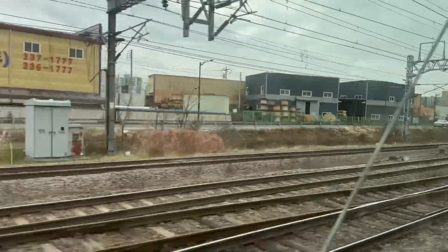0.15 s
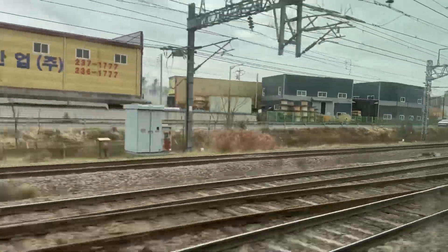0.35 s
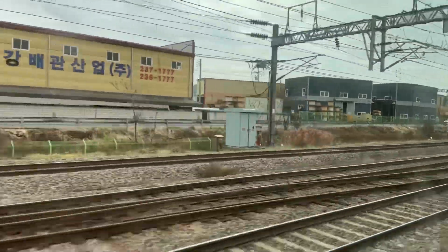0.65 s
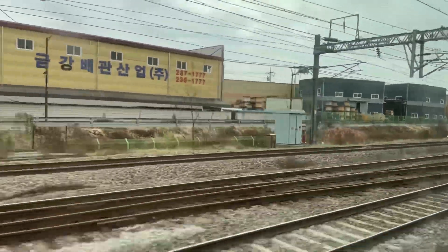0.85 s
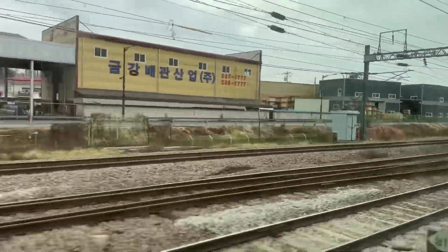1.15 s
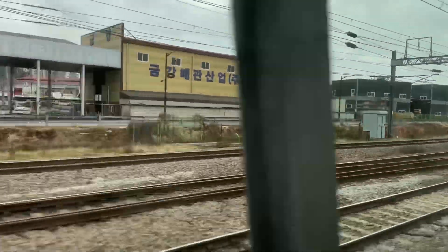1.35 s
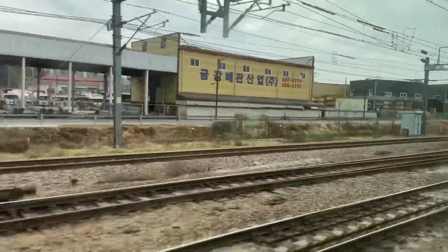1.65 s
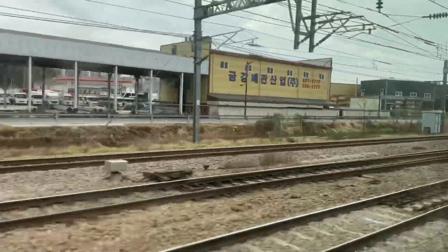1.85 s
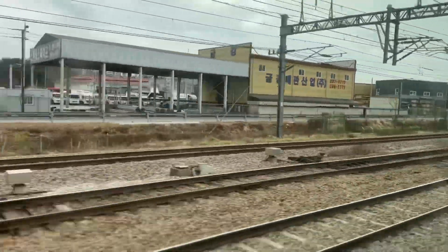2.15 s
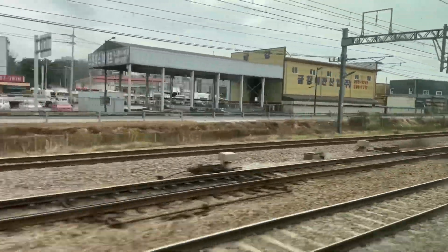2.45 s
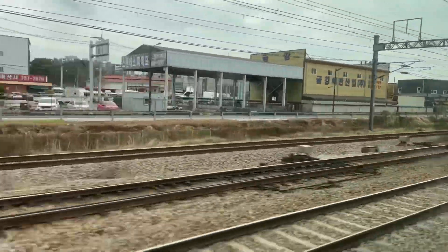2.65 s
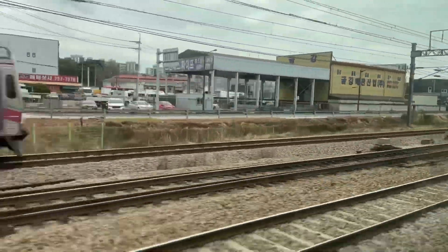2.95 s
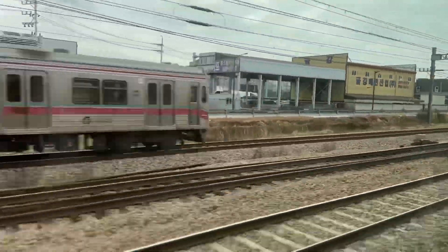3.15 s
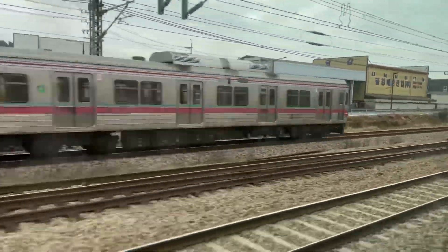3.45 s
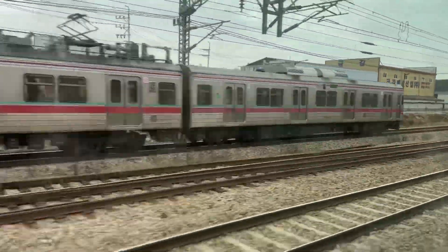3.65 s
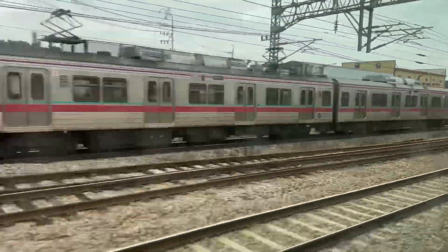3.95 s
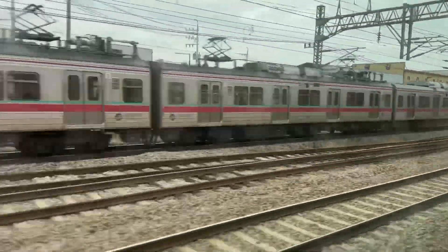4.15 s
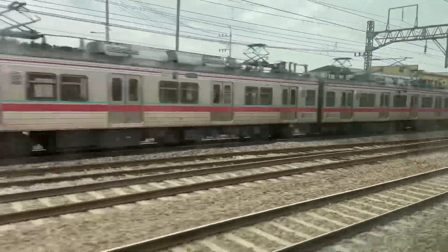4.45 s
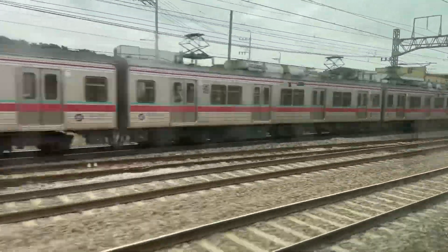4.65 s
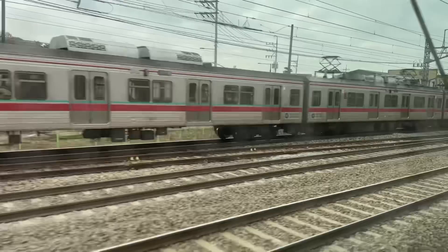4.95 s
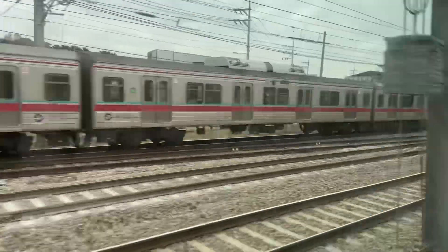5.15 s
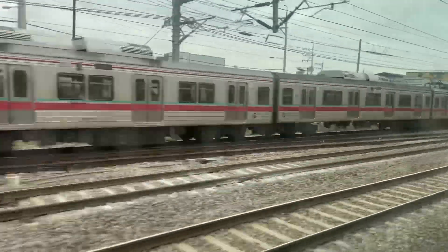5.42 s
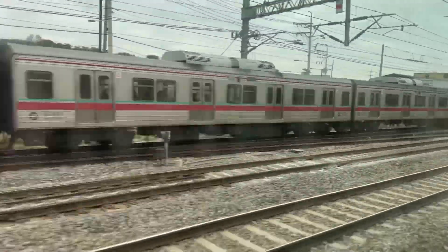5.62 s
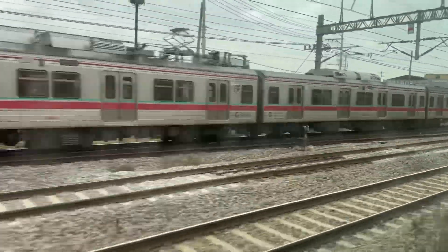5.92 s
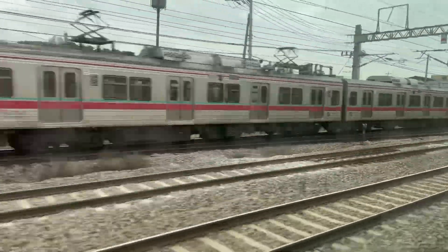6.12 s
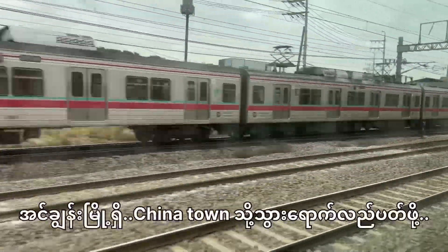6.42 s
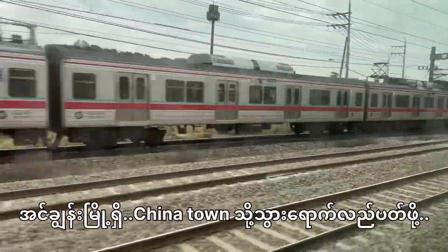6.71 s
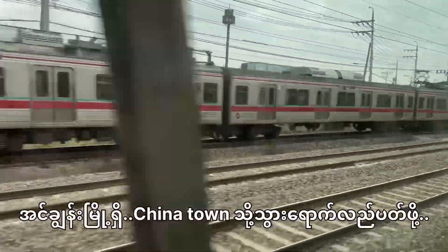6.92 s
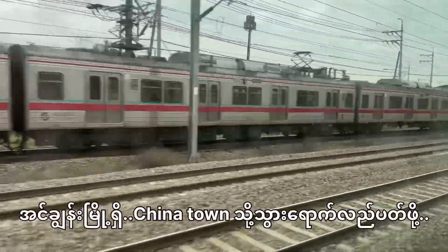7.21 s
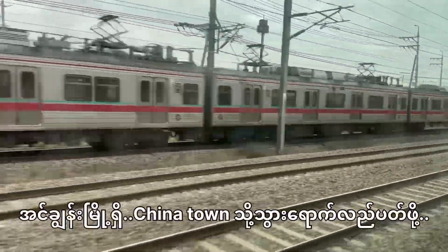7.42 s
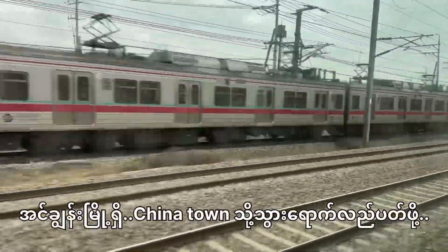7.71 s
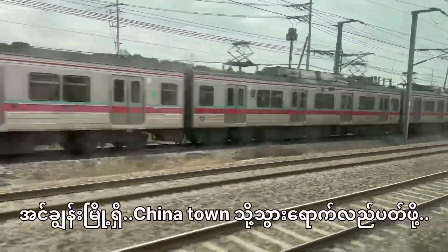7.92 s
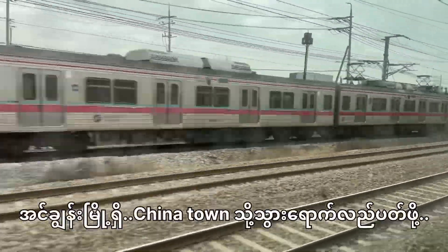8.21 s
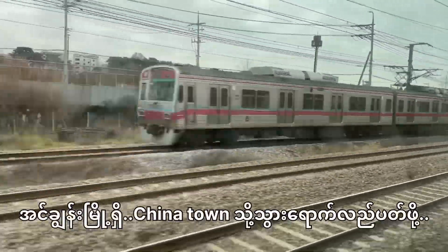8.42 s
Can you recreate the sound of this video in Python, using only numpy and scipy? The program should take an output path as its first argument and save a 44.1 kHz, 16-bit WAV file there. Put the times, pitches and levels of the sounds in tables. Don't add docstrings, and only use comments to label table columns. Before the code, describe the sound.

Inside a passenger train carriage at speed, captured by a handheld phone in narrow stereo. A continuous deep rumble, strongest below about 200 Hz, wavers and booms through the floor, with soft dull hiss above and a faint mid-low machine hum and gear whine. Strong paired wheel thuds land near 0.35, 0.75 and 1.35 seconds, with knocks and short shudders. At 2.3 another pair strikes and the wheel frame rings low briefly. From 2.7 a train alongside subtly changes and fills the roar. Thuds follow at 3.3 and 4.3, where a small air puff hisses, then 4.7, 5.3 and a hard knock at 6.0. A tiny high squeak chirps at 6.1. Uneven drumming and light trim rattles continue, with a metallic tick around 7.4. From 8.0 to 8.35 rapid blows cluster over points, then rumbling continues until 8.6.

```python
import sys
import numpy as np
from scipy import signal
from scipy.fft import rfft, irfft, next_fast_len
from scipy.io import wavfile
from scipy.ndimage import uniform_filter1d

SR = 44100
rng = np.random.default_rng(int(sys.argv[2]) if len(sys.argv) > 2 else 0)


def wav_out(sig):
    wavfile.write(sys.argv[1], SR, np.round(np.clip(np.atleast_2d(sig).T, -1, 1) * 32767).astype(np.int16))


def natural_amplitude(level_db):
    exponent = np.asarray(level_db, float) / 20
    return 10 ** exponent


N = 377937
M = next_fast_len(N, real=True)
T, HZ = np.arange(M) / SR, np.fft.rfftfreq(M, 1 / SR)

# [t/s, level/dB]
ROUGHNESS = [(0.0, -30), (0.55, -26), (0.981, -24), (1.14, -28), (2.58, -27.5), (2.889, -29.5),
             (3.428, -26), (4.32, -28), (4.51, -27), (5.11, -27), (5.37, -23), (6.85, -25.5), (7.23, -24),
             (7.85, -27), (8.21, -23), (8.57, -25.5)]
# [share of roughness felt, gain beside other train/dB, sway/dB, sway rate/Hz]
BODY_PARTS = [
    (0.15, 0.1, 0.4, 20),
    (1, 1.7, 2, 14),
    (0.19, -0.6, 0.7, 14),
    (0.11, 1.9, 0.5, 9),
]
PART_HZ = (70, 170, 550, 3000)
# [f/Hz, level per Hz/dB]
RUMBLE = [(20, -89), (30, -68), (40, -47), (60, -43.5), (130, -46.5), (200, -49), (280, -54.5),
          (340, -55.5), (400, -59), (460, -61), (750, -66), (1100, -70.5), (1300, -75)]
# [f/Hz, level per Hz/dB]
ROLLING_HISS = [(1300, -75), (1900, -77), (2300, -80.5), (2900, -83), (3250, -88.5), (4500, -90.5),
                (5200, -93), (7000, -93), (8500, -101), (9700, -103), (10250, -140), (12300, -145),
                (12600, -125), (14800, -131), (15100, -145)]
# [f/Hz, width/Hz, level/dB]
CABIN_MODES = [(68.7, 16, -29.5), (95.5, 29, -37), (142.2, 17, -34.5), (178, 12, -37), (205.2, 15, -39.5),
               (246, 30, -45), (372, 30, -46.5), (2137, 270, -57.5), (2800, 150, -61), (3525, 80, -68.5)]
# [t/s, f/Hz, level/dB]
BODY_BOOM = [(0.0, 67.7, -35), (0.07, 63.4, -24.5), (2.69, 74.5, -22.5), (3.34, 91.3, -21),
             (3.51, 73.4, -28), (3.7, 90.3, -15.5), (4.15, 59.97, -42), (4.56, 61.9, -22),
             (4.65, 73.8, -21.5), (5.46, 59.2, -22), (6.04, 96.7, -19.5), (6.18, 66.4, -34.5),
             (6.49, 68.4, -20.5), (6.59, 55.2, -23), (7.16, 89.5, -23.5), (7.45, 62.24, -20.5),
             (8.04, 57.3, -24.5), (8.57, 73.8, -20.5)]
# [t/s, f/Hz, level/dB]
FRAME_RING = [
    (2.305, 181, -45),
    (2.325, 179, -17.5),
    (2.4, 186.8, -26.5),
    (2.45, 178, -21),
    (2.49, 186, -49),
]
# [t/s, peak level/dB, low thud level/dB, thud f/Hz, shudder length/s]
JOINT_BLOWS = [(0.33, -9, -24, 149.3, 0.22), (0.4, -10, 0, 132, 0.21), (0.725, -17, -14, 142, 0.25),
               (0.769, -19.5, 2.5, 243, .23), (1.322, -15, -3, 173, .26), (1.404, -11, -15.5, 131, 0.21),
               (2.318, -13.5, -13, 178, 0.26), (2.393, -11.5, -11.5, 178, 0.29),
               (3.319, -16.5, 3.5, 181, 0.15), (3.408, -19.5, -19, 145, 0.28), (4.28, -15, -14, 143, 0.31),
               (4.347, -14, -6, 196, 0.22), (4.528, -17.5, 7, 137, 0.14), (4.731, -19.5, 7, 178.4, 0.25),
               (5.252, -12.5, -5.5, 169.7, 0.2), (5.328, -11, -8, 129, 0.21),
               (5.781, -15.5, 2.5, 149.5, 0.14), (5.997, -9, -7, 234.5, .1),
               (6.994, -19.5, -4.5, 132, 0.23), (7.538, -28, -3, 144.9, 0.28), (8.003, -20, -8, 239, 0.22),
               (8.059, -13.5, -4, 225, 0.15), (8.099, -16.5, -3, 133.5, 0.18), (8.134, -31, 2, 179, .2),
               (8.172, -14, -8, 151, 0.2), (8.261, -9, -10.5, 221, .13)]
# [t/s, thud level/dB, f/Hz]
RAIL_DIPS = [(1.715, -24.5, 129), (1.888, -13.5, 147.7), (2.585, -16.5, 177.4), (3.051, -21, 138.4),
             (3.85, -10, 151.3), (5.152, -30, 149), (5.409, -16, 134), (5.486, -3.5, 131.5),
             (6.197, -12.5, 188.6), (6.626, -14.5, 160.6), (7.118, -7.5, 163.7), (7.489, -16.5, 172),
             (8.508, -13, 141.4), (1.591, -18.5, 179.3), (1.839, -19.5, 138.7), (2.819, -17, 158.6),
             (4.595, -15, 144.5), (6.319, -17, 178), (7.366, -29, 192)]
# [f/Hz, level per Hz/dB]
SHUDDER_COLOUR = [(60, -22), (150, 8.5), (330, 5), (700, -8.5), (1200, -17.5), (2200, -21.5), (3200, -32),
                  (8000, -40), (10400, -68.5)]
# [f/Hz, level/dB, time to fall 60 dB t/s]
FLOOR_PLATE = [(263, -12.5, 0.011), (324.3, 1, 0.12), (390, -10, 0.053), (594, -10.5, 0.064),
               (664, -3.5, 0.052), (930, -30.5, 0.044), (1500, -22.5, .03), (2800, -28, .02)]
# [t/s, peak level/dB, f/Hz]
BODY_HEAVES = [(0.151, -15, 60.2), (0.476, -18.5, 123.7), (0.799, -14.5, 79.6), (0.897, -13, 64.6),
               (1.182, -13, 81.4), (1.29, -17.5, 61.6), (1.396, -13.5, 114.5), (1.506, -10.5, 86.5),
               (1.594, -11, 75.7), (1.704, -17, 94.2), (1.951, -16, 72.4), (2.01, -10, 87),
               (2.111, -14, 125), (2.319, -16.5, 78.6), (2.416, -19, 83), (2.54, -14, 80.7),
               (2.819, -10, 66.7), (2.941, -9.5, 84.5), (3.03, -13, 84), (3.127, -17, 90.5),
               (3.244, -15, 95.5), (3.666, -16.5, 88.3), (3.815, -11, 75.4), (3.896, -14, 78.5),
               (3.962, -11.5, 70.0), (4.23, -18, 85), (4.369, -23, 72.7), (4.484, -15.5, 67.6),
               (4.735, -17.5, 72.7), (4.858, -9, 79), (4.934, -13.5, 60.4), (5.218, -10, 73),
               (5.317, -12.5, 94.2), (5.408, -17, 69.5), (5.631, -12, 59.2), (5.771, -9, 64.6),
               (5.876, -15.5, 78.1), (6.018, -14, 101), (6.139, -19.5, 120.4), (6.3, -23, 51.1),
               (6.3, -10.5, 66.4), (6.37, -15, 64.6), (6.532, -18, 64.3), (6.596, -20, 65.4),
               (6.759, -13.5, 120.5), (6.913, -16, 88.5), (6.998, -14, 83), (7.129, -10.5, 73.4),
               (7.325, -10, 81.6), (7.722, -10, 72), (7.819, -17, 67.7), (7.882, -16.5, 72.7),
               (8.001, -16, 73), (8.094, -11, 83.4), (8.16, -13, 69.4), (8.274, -21, 98.7)]
# [t/s, peak level/dB, f/Hz]
FLOOR_DRUMS = [(0.346, -12, 144), (0.689, -15, 127.5), (0.797, -17.5, 164.2), (1.182, -14.5, 142),
               (1.338, -17, 173), (1.551, -19, 133), (1.723, -20, 143), (1.783, -17.5, 143),
               (1.84, -20, 135), (2.312, -11.5, 184), (2.399, -12, 190.6), (2.487, -14, 135.5),
               (2.567, -13, 178), (2.818, -18, 159), (3.066, -18, 130), (3.139, -20, 138),
               (3.303, -16, 124), (3.618, -20, 196), (3.764, -19, 134), (3.849, -15.5, 145),
               (4.297, -15, 151), (4.4, -15, 154.9), (4.516, -17, 136.5), (4.596, -15, 143),
               (4.73, -17, 188), (4.812, -11, 155), (4.961, -13, 125), (5.022, -10.5, 178),
               (5.241, -15.5, 171), (5.346, -14, 126), (5.476, -12, 140), (5.579, -18, 136),
               (5.793, -13.5, 137), (6.103, -10.5, 131.4), (6.222, -9.5, 157), (6.319, -17.5, 127.4),
               (6.373, -17, 152.2), (6.433, -19.5, 129), (6.545, -6, 145), (6.645, -20.5, 167),
               (6.74, -18.5, 158), (6.849, -15, 146), (6.977, -18.5, 129), (7.04, -11, 161),
               (7.144, -9, 190), (7.295, -17, 136), (7.429, -8, 170), (7.488, -13, 175.5),
               (7.824, -20, 152), (7.886, -14, 172), (8.054, -17.5, 210), (8.116, -16, 168),
               (8.172, -11, 193), (8.228, -14, 165.5), (8.305, -10.5, 154), (8.401, -18, 187)]
# [t/s, peak level/dB, f/Hz]
SHARP_CRACKS = [(0.238, -23, 524), (0.328, -27, 450), (0.3315, -22, 706), (0.349, -23, 498),
                (0.352, -25, 850), (0.365, -27.5, 804), (0.406, -18.5, 570), (0.413, -24, 910),
                (0.424, -25, 890), (0.435, -25, 760), (0.62, -24, 577), (0.679, -30, 694),
                (0.728, -18.5, 526), (0.805, -24.5, 610), (1.326, -27, 800), (1.345, -26, 465),
                (1.410, -19.5, 700), (1.428, -25, 750), (1.711, -26.5, 710), (1.773, -36, 563),
                (2.317, -17.5, 543), (2.403, -35, 450), (2.549, -27, 611), (4.268, -24.5, 525),
                (4.285, -22.5, 886), (4.319, -24, 475), (4.348, -22, 437), (4.364, -19, 607),
                (4.744, -24.5, 455), (5.266, -27, 503), (5.328, -24, 493), (5.565, -24.5, 544),
                (5.594, -21, 506), (5.649, -22, 700), (5.999, -32, 452), (6, -13.5, 430), (6.26, -34, 480),
                (6.3, -18, 497), (6.703, -35, 754), (7.493, -33.5, 504), (7.542, -27, 611),
                (8.0, -20.5, 620), (8.063, -24.5, 452), (8.15, -34, 579), (8.182, -28, 510),
                (8.206, -33, 452), (8.262, -17.5, 590), (8.313, -17, 440), (8.338, -19.5, 750)]
# [t/s, peak level/dB, f/Hz]
METAL_TICKS = [(0.3314, -40, 1920), (0.409, -28, 1750), (2.3126, -36, 1940), (2.397, -39, 1880),
               (3.2784, -33, 2360), (5.999, -37, 1790), (7.365, -39, 1500), (7.5413, -37, 1920),
               (7.8984, -34, 1719), (8.0896, -36, 1650), (8.1813, -40, 2120), (8.2621, -42, 1750)]
# [t/s, peak level/dB, f/Hz]
FLOOR_KNOCKS = [(0.34, -26, 200), (0.349, -18, 310), (0.375, -13.5, 288), (0.41, -15.5, 198),
                (0.43, -14.5, 202), (0.435, -16, 274), (0.477, -17, 282), (1.342, -11, 199),
                (1.357, -6.5, 200), (1.382, -15.5, 202), (1.35, -15, 370), (1.37, -16.5, 380),
                (1.405, -13, 377), (1.42, -17, 397), (1.445, -16, 389), (1.432, -17, 229),
                (1.454, -12, 201), (2.317, -19.5, 203), (2.339, -27.5, 202), (2.359, -21.5, 310),
                (2.404, -8, 202), (2.428, -10, 337), (2.451, -16, 219), (4.339, -17.5, 203),
                (4.352, -13, 202), (4.372, -15.5, 220), (4.404, -22, 232), (4.743, -15.5, 212),
                (5.254, -25, 200), (5.265, -19, 266), (5.289, -29, 235), (5.33, -14, 272),
                (5.345, -14, 213), (5.352, -14.5, 250), (5.998, -22.5, 307), (6.008, -16, 302),
                (6.083, -14, 236), (6.11, -13, 297), (6.2, -18.5, 342), (6.227, -18, 223), (6.26, -17, 323),
                (6.297, -13, 300), (8.016, -9, 242), (8.062, -18, 211), (8.099, -26, 202),
                (8.116, -17, 202), (8.134, -12, 202), (8.164, -11.5, 256), (8.177, -9, 202),
                (8.193, -11.5, 281), (8.216, -16, 280), (8.23, -19.5, 202), (8.264, -21.5, 339),
                (8.278, -6, 251), (8.304, -17.5, 202), (8.324, -13.5, 202)]
# [t/s, peak level/dB, thin top level/dB]
TRIM_RATTLES = [(1.166, -51.5, -47), (2.32, -49, -53), (2.417, -49.5, -52), (2.927, -48, -35),
                (3.293, -43, -34), (3.826, -47.5, -22), (4.894, -45, -43), (5.241, -40, -24),
                (5.393, -43, -21), (5.771, -45, -22.5), (5.9194, -58, -25), (5.9968, -52.5, -47),
                (6.71, -43, -26), (7.365, -57.5, -19), (7.41, -63, -11.5), (7.935, -53, -17),
                (7.575, -43.5, -27), (7.7454, -51, -30), (7.905, -45.5, -18), (8.089, -44.5, -40),
                (8.185, -48.5, -40), (8.261, -44.5, -41), (8.3458, -39.5, -30), (8.4422, -56, -42)]
# [t/s, peak level/dB, f/Hz, width/Hz]
PANEL_CLANKS = [(1.318, -58, 2200, 880), (2.317, -41.5, 2300, 905), (2.41, -42, 2190, 707),
                (2.927, -46.5, 2300, 300), (3.284, -40, 2380, 150), (4.894, -38.5, 2320, 302),
                (4.93, -48, 2280, 304.3), (5.925, -41.5, 2380, 904), (6.114, -43, 2620, 250),
                (7.365, -41, 1500, 300), (7.539, -38, 2160, 1400), (7.75, -46.5, 2300, 1200),
                (7.9, -42, 2330, 1401), (8.089, -39.5, 1930, 600), (8.261, -44, 2800, 1500),
                (8.347, -45, 3760, 2500)]
# [t/s, hiss level/dB, thin top level/dB]
VALVE_PUFF = [
    (4.24, -60.5, -23),
    (4.29, -52.5, -10),
    (4.335, -50.5, -8),
    (4.386, -43, -12),
    (4.42, -53.5, -24),
    (4.455, -76, -15),
]
# [t/s, f/Hz, level/dB]
FITTING_SQUEAK = [
    (6.098, 5850, -68),
    (6.105, 5900, -42),
    (6.113, 5850, -44),
    (6.116, 5950, -60),
    (6.12, 5800, -46),
    (6.148, 5860, -50),
    (6.158, 5880, -70),
    (6.17, 5950, -57),
    (6.178, 5900, -74),
]
# [multiple, start level/dB, end level/dB]
GEAR_LINES = [
    (4, -47, -45.5),
    (5, -46.5, -44.5),
    (6, -59, -52),
    (7, -53, -62),
]
# [t/s, f/Hz, level/dB]
STEADY_HUM = [
    (0, 372, -41.5),
    (8.57, 371.3, -40.5),
]
# [f/Hz, shared part 0-1]
PORTS_SHARED = [(60, 0.98), (125, 1), (250, 0.94), (500, 0.66), (1000, 0.49), (2000, 0.11), (4000, 0.09),
                (7500, 0.34), (9000, 0), (12800, 0), (13400, 0.95)]
# [f/Hz, level/dB]
LEFT_OVER_RIGHT = [(100, -.5), (220, -0.5), (340, 3.5), (520, -1.5), (1000, 3), (2200, -3), (4500, 2.5),
                   (9000, 4), (12500, -10)]


def on_log(table, hz):
    f, v = np.transpose(table)
    return np.interp(np.log(np.maximum(hz, 1)), np.log(f), v)


def unit(x):
    return x / np.sqrt(np.mean(x ** 2))


def walk(rate):
    k = int(SR / rate)
    steps = np.repeat(rng.standard_normal(M // k + 1), k)
    return unit(uniform_filter1d(uniform_filter1d(steps, k), k)[:M])


def ports(near, stray):
    lag_s, lag_top_hz = 0.00021, 6100
    share = np.clip(on_log(PORTS_SHARED, HZ), 0, 1)
    turn = np.exp(-1j * np.pi * HZ * lag_s / (1 + (HZ / lag_top_hz) ** 8))
    both = np.sqrt(share) * near * np.array([turn, 1 / turn]) + np.sqrt(1 - share) * stray
    return both * natural_amplitude(np.outer([.5, -.5], on_log(LEFT_OVER_RIGHT, HZ)))


def air():
    white = rfft(rng.standard_normal((3, M)))
    return ports(white[0], white[1:])


def band(noise, lo_hz, hi_hz, edge=.06):
    slope = np.clip(np.log2(np.maximum(HZ, 1) / lo_hz) / edge, 0, 1)
    return unit(irfft(noise * slope * (HZ < hi_hz), M))


def ringing(noise, hz, width):
    return unit(irfft(noise / (1 + 2j * (HZ - hz) / width) ** 2, M))


def span(t0, length_s):
    i = slice(int(t0 * SR) + 1, int((t0 + length_s) * SR))
    return i, T[i] - t0


def fades(times, gains, t60s, rise_s, hold=1.52):
    out = np.zeros(M)
    for t0, gain, t60 in zip(times, gains, t60s):
        i, t = span(t0, t60)
        out[i] += gain * (1 - np.exp(-t / rise_s)) * 1000. ** -((t / t60) ** hold)
    return out


def centres():
    for hz in 2 ** np.arange(4.5, 14.1, .5):
        yield hz, np.cos(np.pi * np.clip(np.log2(np.maximum(HZ, 1) / hz), -.5, .5))


def tone(table, wobble_hz, flicker_db, rate):
    s, hz, db = np.transpose(table)
    phase = 2 * np.pi * np.cumsum(np.interp(T, s, hz) + wobble_hz * walk(rate)) / SR
    level = natural_amplitude(np.interp(T, s, db) + flicker_db * walk(rate))
    line = np.sqrt(2) * np.sin(phase) * level * (T >= s[0]) * (T <= s[-1])
    return irfft(ports(rfft(line), 0), M)


def ripple():
    depth_db, spacing_hz = 1.55, 22.1
    k = int(spacing_hz / HZ[1])
    bumps = unit(uniform_filter1d(uniform_filter1d(rng.standard_normal(len(HZ)), k), k))
    return natural_amplitude(depth_db * bumps * np.clip(HZ / 900, 0, 1))


def rolling():
    together_db, flicker_db = -0.31, 0.95
    other_train_s, other_train_rise_s = 2.7, 0.3
    s, db = np.transpose(ROUGHNESS)
    rough = np.interp(T, s, db - np.mean(db))
    beside = np.tanh((T - other_train_s) / other_train_rise_s) / 2
    swing = np.array([share * rough + gain_db * beside + sway_db * walk(rate)
                      for share, gain_db, sway_db, rate in BODY_PARTS])

    def nearest(hz):
        weights = [on_log(list(zip(PART_HZ, row)), hz) for row in np.eye(len(BODY_PARTS))]
        return np.array(weights) @ swing

    colour = natural_amplitude(on_log(RUMBLE + ROLLING_HISS[1:], HZ)) * np.sqrt(SR / 2)
    noise = air() * ripple() * colour
    shake, out = walk(12.0), 0
    for hz, window in centres():
        level_db = nearest(hz) + together_db * shake + flicker_db * walk(12)
        out = out + irfft(noise * window ** 2, M) * natural_amplitude(level_db)
    noise = air()
    for hz, width, db in CABIN_MODES:
        out = out + natural_amplitude(db + nearest(hz)) * ringing(noise, hz, width)
    return out


def boom():
    body = tone(BODY_BOOM, wobble_hz=7.17, flicker_db=2.0, rate=12) * natural_amplitude(-7.5)
    return body + tone(FRAME_RING, wobble_hz=7.7, flicker_db=0.5, rate=30)


def joints():
    shudder_db, knock_db, thump_db, clank_db = -11, -9, -5, -29
    thump_share, rise_s, treble_damp = 1.2, 0.0034, 0.4
    dip_knock_db, ring_s = -12.5, 0.28
    dips = [(t0, db + dip_knock_db, -dip_knock_db, hz, ring_s) for t0, db, hz in RAIL_DIPS]
    s, db, thud_db, thud_hz, ring = np.transpose(JOINT_BLOWS + dips)
    noise, out = air() * natural_amplitude(on_log(SHUDDER_COLOUR, HZ)), 0
    blow_body = irfft(noise * (HZ > 250) * (HZ < 1200), M)
    noise = noise / np.std(blow_body)
    for hz, window in centres():
        tint_db = (thud_db - 8.5) * on_log([(170, 0.39), (300, 0.056)], hz)
        tint_db = tint_db + (clank_db + 28.5) * on_log([(900, 0.016), (1800, 0.95)], hz)
        length = ring * (400 / hz) ** treble_damp
        size = fades(s, natural_amplitude(db + tint_db + shudder_db), length, rise_s, hold=1.68)
        out = out + irfft(noise * window ** 2, M) * size
    knock, chance = np.zeros(M), rng.standard_normal((len(s), len(FLOOR_PLATE)))
    for k, t0 in enumerate(s):
        i, t = span(t0, .6)
        modes = [(hz * (1 + 0.084 * off), mode_db + knock_db, t60)
                 for (hz, mode_db, t60), off in zip(FLOOR_PLATE, chance[k])]
        thump = (thud_hz[k], thud_db[k] + thump_db, thump_share * ring_s)
        for hz, mode_db, t60 in modes + [thump]:
            knock[i] -= natural_amplitude(db[k] + mode_db) * np.sin(2 * np.pi * hz * t) * 1000. ** (-t / t60)
    return out + irfft(ports(rfft(knock) / (1 + 1j * HZ / 3000) ** 2, 0), M)


def heaves():
    out = np.zeros(M)
    # table, gain/dB, rise/s, decay/s
    for table, gain_db, rise_s, t60 in ((BODY_HEAVES, -1, 0.017, 0.14), (FLOOR_DRUMS, -4, 0.008, .11)):
        for t0, db, hz in table:
            i, t = span(t0, t60)
            swell = (1 - np.exp(-t / rise_s)) * 1000. ** -((t / t60) ** 2)
            out[i] -= natural_amplitude(db + gain_db) * np.sin(2 * np.pi * hz * t) * swell
    return out


def cracks():
    overtones = ((1, 0), (1.62, -7), (2.7, -15), (.58, -1.5))
    contact_hz = 4500
    out = heaves()
    # table, gain/dB, decay/s
    for table, gain_db, t60 in ((SHARP_CRACKS, -4, 0.052), (METAL_TICKS, -4, .02), (FLOOR_KNOCKS, -5, 0.063)):
        for t0, db, hz in table:
            i, t = span(t0, 2 * t60)
            for k, part_db in overtones:
                decay = 1000. ** (-t * np.sqrt(k) / t60)
                out[i] -= natural_amplitude(db + gain_db + part_db) * np.sin(2 * np.pi * k * hz * t) * decay
    return irfft(ports(rfft(out) / (1 + 1j * HZ / contact_hz) ** 3, 0), M)


def rattles():
    rattle_db, rattle_s, clank_s = -7, .11, 0.091
    s, db, top_db = np.transpose(TRIM_RATTLES)
    noise, length = air(), np.full(len(s), rattle_s)
    hiss = band(noise * natural_amplitude(on_log([(7000, -6.0), (10300, -16.0)], HZ)), 3500, 10150, edge=0.73)
    top = band(noise, 12400, 15700)
    out = hiss * fades(s, natural_amplitude(db + rattle_db), length, 0.0007)
    out = out + top * fades(s, natural_amplitude(db + top_db + rattle_db), length, .002)
    for t0, clank_db, hz, width in PANEL_CLANKS:
        out = out + ringing(noise, hz, width) * fades([t0], [natural_amplitude(clank_db)], [clank_s], 0.0011)
    s, db, top_db = np.transpose(VALVE_PUFF)
    puff = natural_amplitude(np.interp(T, s, db)) * (T > s[0]) * (T < s[-1])
    return out + puff * (hiss + top * natural_amplitude(np.interp(T, s, top_db)))


def squeak():
    return tone(FITTING_SQUEAK, wobble_hz=9.6, flicker_db=-6.0, rate=180)


def gear():
    shaft_hz, gain_hz_per_s = 140.6, 1.2
    end, out = N / SR, 0
    for k, start_db, end_db in GEAR_LINES:
        line = [(0, k * shaft_hz, start_db), (end, k * (shaft_hz + gain_hz_per_s * end), end_db)]
        out = out + tone(line, wobble_hz=1.78, flicker_db=2.0, rate=8)
    return out


def hum():
    return tone(STEADY_HUM, wobble_hz=5.53, flicker_db=0.5, rate=10)


def scene():
    train = rolling() + boom() + joints() + cracks()
    return (train + rattles() + squeak() + gear() + hum())[:, :N]


def roll_off(x):
    return signal.sosfilt(signal.butter(12, 15720, fs=SR, output="sos"), x)


def record(dry):
    soft = np.tanh(1.094 * dry) / 1.117
    heard = (HZ < 10250) | (HZ > 12350)
    mix = irfft(rfft(soft, M) * heard, M)[:, :N]
    return roll_off(mix)


dry = scene()
out = record(dry)
wav_out(out)
```